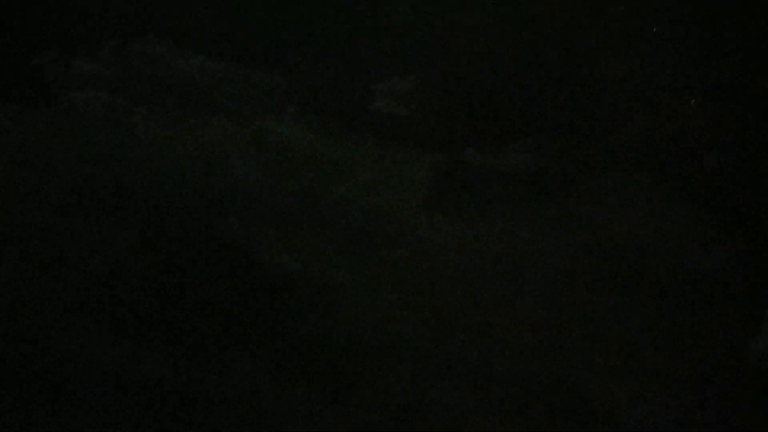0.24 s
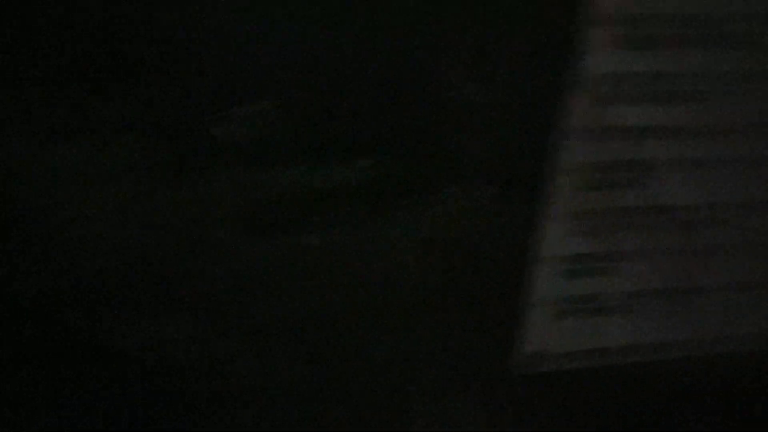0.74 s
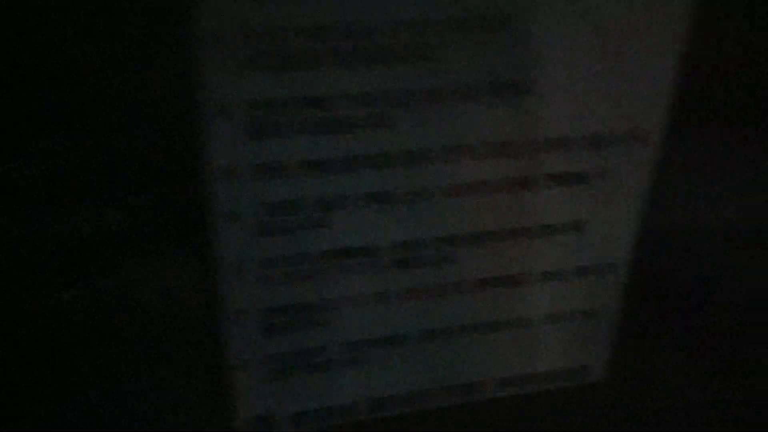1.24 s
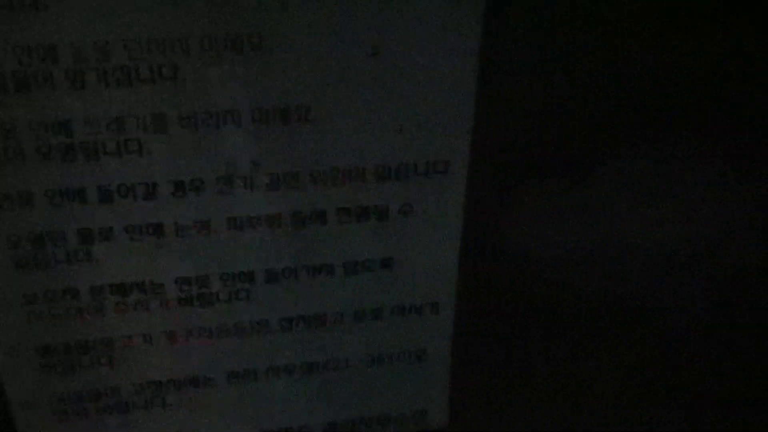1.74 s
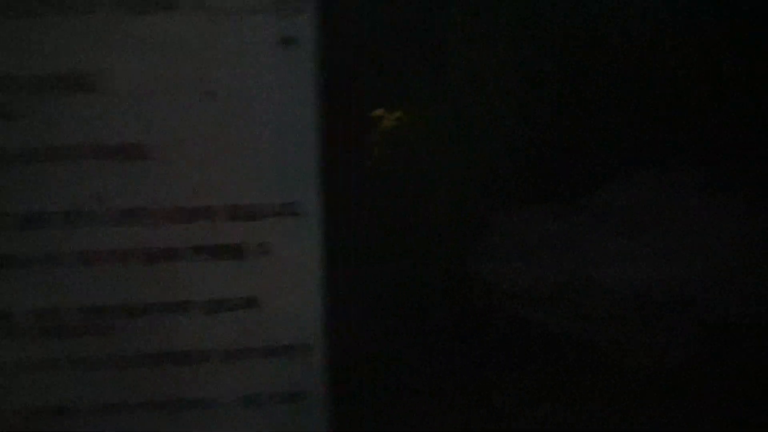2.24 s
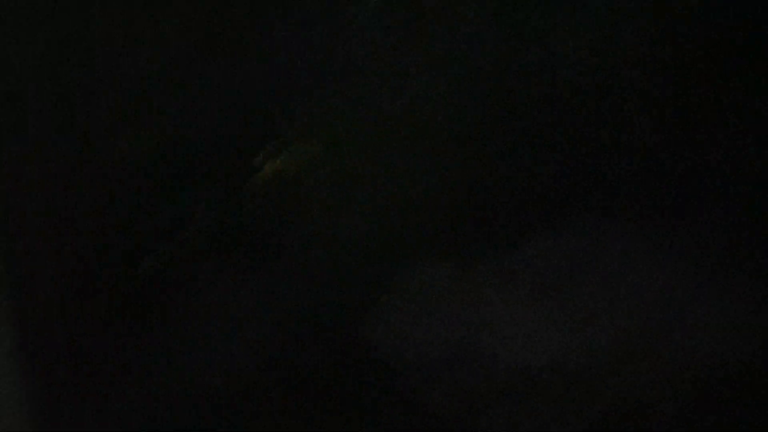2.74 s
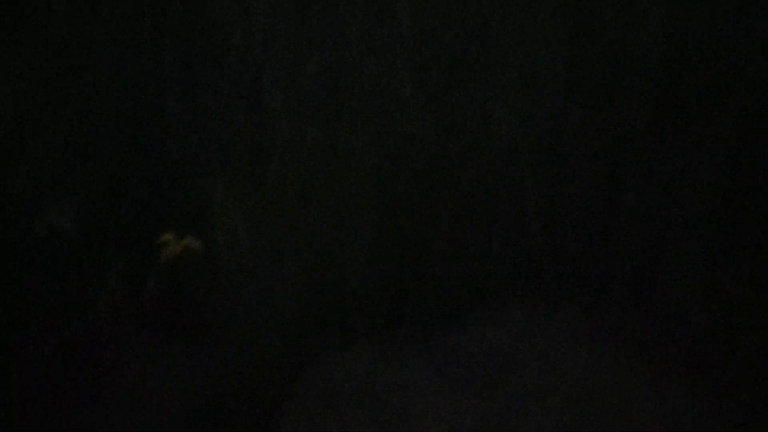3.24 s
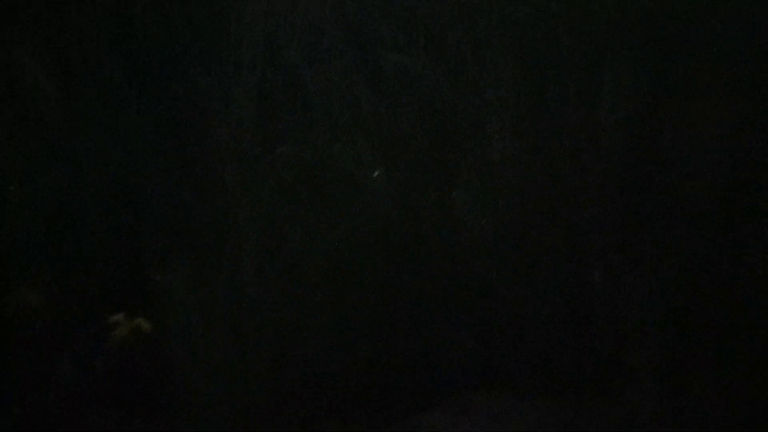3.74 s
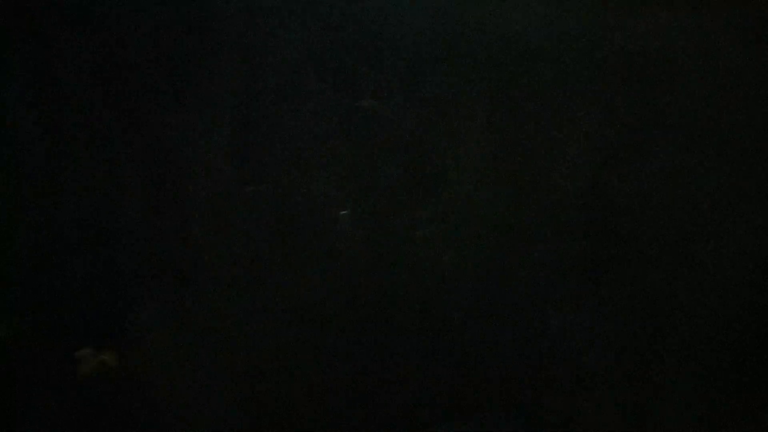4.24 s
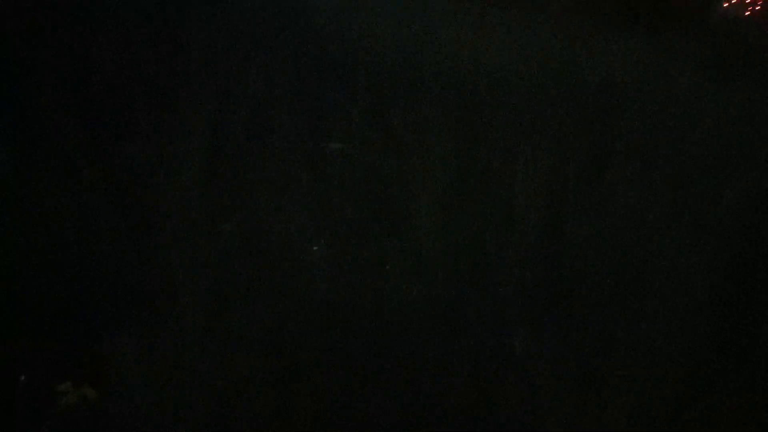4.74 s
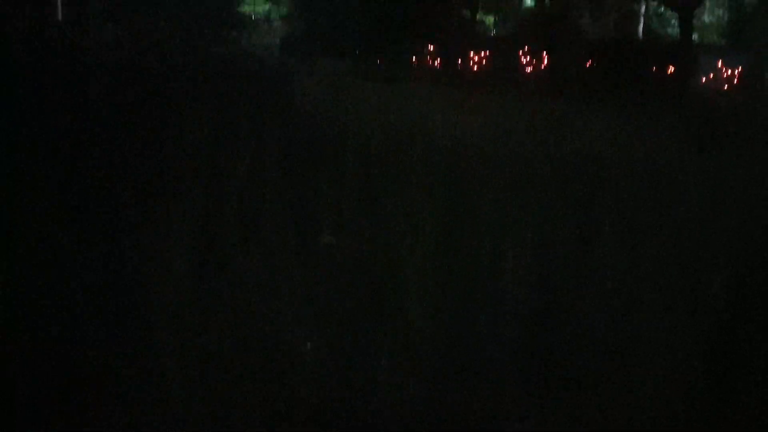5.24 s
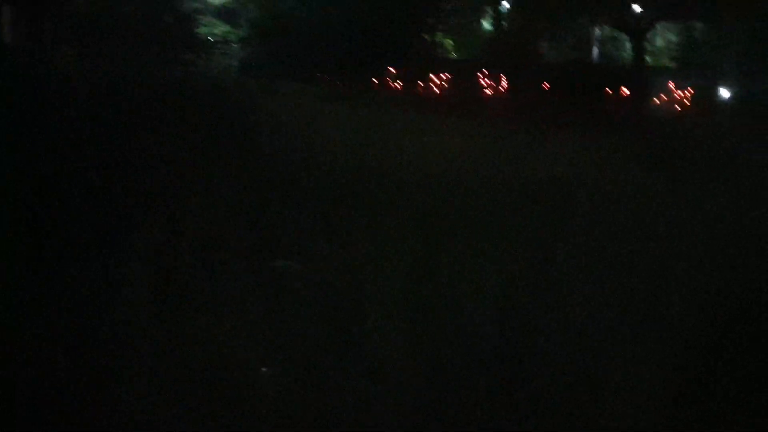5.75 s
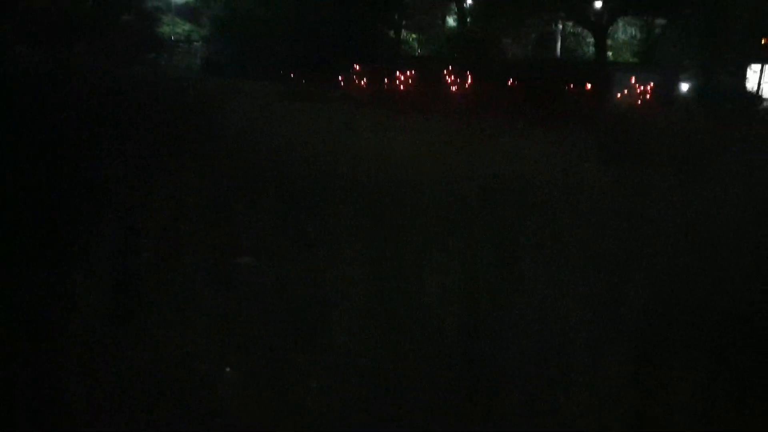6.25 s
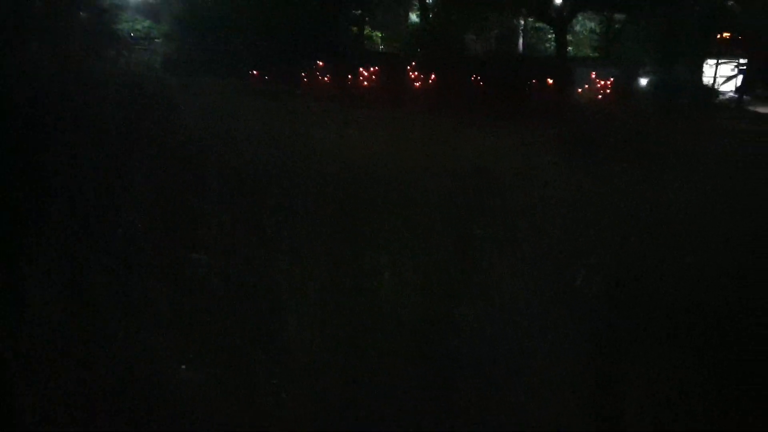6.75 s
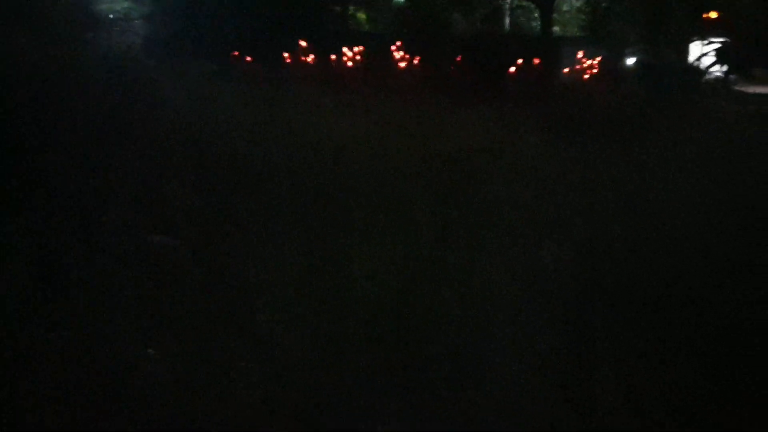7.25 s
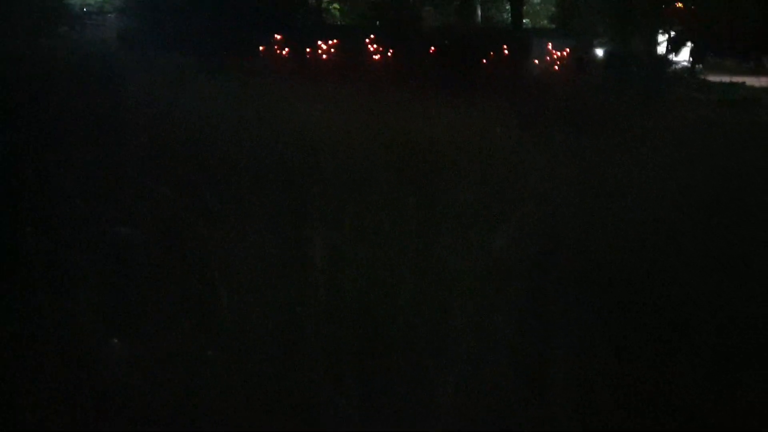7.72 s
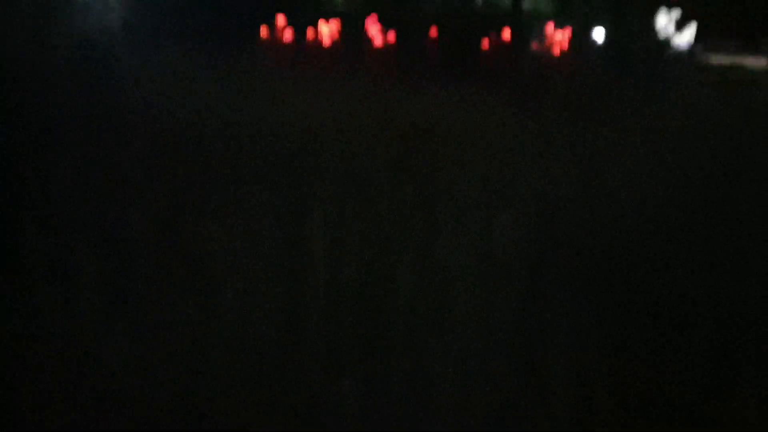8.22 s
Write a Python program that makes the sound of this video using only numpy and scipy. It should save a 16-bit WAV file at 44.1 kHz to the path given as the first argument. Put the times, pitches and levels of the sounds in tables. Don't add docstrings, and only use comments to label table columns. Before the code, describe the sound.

A near tree frog calls three times a second, a shore group answering in the gaps, over night hiss, faint road rumble and microphone bumps.

```python
import sys
import numpy as np
from scipy import signal
from scipy.fft import rfft, irfft
from scipy.io import wavfile

SR = 44100
rng = np.random.default_rng(int(sys.argv[2]) if len(sys.argv) > 2 else 0)


def nominal_scale(level):
    x = np.asarray(level, float) / 20
    return 10 ** x


def materialize(psi):
    bounded = np.clip(np.atleast_2d(psi).T, -1, 1)
    quanta = np.round(bounded * 32767).astype(np.int16)
    wavfile.write(sys.argv[1], SR, quanta)


N = 373968


def at_hz(points, hz):
    point_hz, level_db = np.transpose(points)
    return np.interp(np.log(hz), np.log(point_hz), level_db)


def drift(rate_hz):
    knots = rng.standard_normal(int(N / SR * rate_hz) + 3)
    return np.interp(np.arange(N) / SR * rate_hz, np.arange(len(knots)), knots)


def coloured(spectrum, alike, lag_ms):
    hz = np.maximum(np.arange(N // 2 + 1) * SR / N, 1)
    share = np.clip(at_hz(alike, hz), 0, 1)
    shared, left, right = rfft(rng.standard_normal((3, N)))
    late = shared * np.exp(-2j * np.pi * hz * lag_ms / 1000)
    pair = np.sqrt(share) * np.array([shared, late]) + np.sqrt(1 - share) * np.array([left, right])
    noise = irfft(pair * nominal_scale(at_hz(spectrum, hz)), N)
    return noise / noise.std()


def pulses(at_s, modes, pan_db, lag_ms):
    out = np.zeros((2, N))
    length, lead = 310, 8
    index = np.floor(at_s * SR).astype(int)[:, None] - lead + np.arange(length)
    inside = (index >= 0) & (index < N)
    fade = np.sin(np.pi / 2 * np.minimum(np.arange(length, 0, -1) / 130, 1)) ** 2
    for side, sign in enumerate((1, -1)):
        arrival = at_s + side * lag_ms / 1000
        t = np.maximum(index / SR - arrival[:, None], 0)
        pan = nominal_scale(sign * pan_db / 2)
        wave = 0
        for hz, height, rise_ms in modes:
            u = t / (rise_ms / 1000)
            swell = (u * np.exp(1 - u)) ** 2
            wave = wave + (height * pan)[:, None] * swell * np.sin(2 * np.pi * hz[:, None] * t)
        out[side] = np.bincount(index[inside], (wave * fade)[inside], N)
    return out


# pitch_hz, level_db (per Hz)
ROAD_COLOUR = [(12, -59.5), (20, -44.5), (37, -6.5), (64, 1.5), (112, -6), (166, -13.5), (310, -19),
               (352, -20), (433, -20.5), (900, -24), (1170, -64.5), (1980, -120)]
# pitch_hz, likeness (0-1)
ROAD_ALIKE = [(25, 0.35), (70, 0.6), (150, 0.88), (400, 0.7), (900, 0.5)]
# time_s, change_db, half_width_s
ROAD_SWELLS = [
    (1.5, 0.5, 0.3),
    (3.062, 4.5, 0.13),
    (4.1, 0.5, 0.19),
    (5.151, 2.5, 0.22),
    (6.1, -3, 0.15),
    (7.899, 2, 0.1),
    (8.179, 6.5, 0.19),
    (8.48, 2.5, 0.049),
]


def traffic():
    t = np.arange(N) / SR
    level_db = -47.5 + drift(6.4)
    for time_s, change_db, half_width_s in ROAD_SWELLS:
        level_db = level_db + change_db * np.exp(-((t - time_s) / half_width_s) ** 2)
    return nominal_scale(level_db) * coloured(ROAD_COLOUR, ROAD_ALIKE, lag_ms=0.15)


# pitch_hz, level_db (per Hz)
NIGHT_COLOUR = [(410, -51), (700, -28.5), (873, -45.5), (1090, -6), (1830, -18.5), (2170, -12.5),
                (2430, -5.5), (2560, -2), (3370, -21), (3990, -24.5), (5170, -30), (6970, -22),
                (10400, -52), (15600, -73)]
# time_s, level_db
NIGHT_LOUDNESS = [(0.0, -42), (0.57, -38), (1.04, -42), (1.49, -35), (2.24, -37), (2.36, -41), (5.41, -37),
                  (5.55, -34), (6.42, -33), (6.68, -37), (7.75, -37), (8.48, -32)]


def night_noise():
    level_db = np.interp(np.arange(N) / SR, *np.transpose(NIGHT_LOUDNESS))
    noise = coloured(NIGHT_COLOUR, [(1000, 0.64), (9000, 0.35)], lag_ms=0.388)
    return nominal_scale(level_db - 6 + drift(9)) * noise


# start_s, length_s, level_db (rms), low_edge_hz, crackle_db
RUBS = [(0.186, 0.073, -58, 5660, 12), (0.74, 0.13, -57, 4000, 0), (0.762, 0.033, -42.5, 3030, 0.5),
        (1.473, 0.014, -38.5, 2500, 14), (1.602, 0.019, -32.5, 4000, 22), (3.069, 0.016, -50.5, 102.2, -5),
        (1.639, 0.45, -61.5, 7250, -4.5), (1.88, 0.03, -53.5, 7040, 12), (2.478, 0.086, -62, 8450, 3),
        (2.717, 0.057, -59, 6900, 10), (3.055, 0.056, -38.5, 3120, 1), (3.102, 0.034, -61, 4950, -1),
        (3.13, 0.32, -63.5, 6840, 3.5), (4.106, 0.6, -65, 8950, -3), (8.142, 0.076, -63, 8100, 10.5)]


def rustles():
    out, t = np.zeros((2, N)), np.arange(N) / SR
    for start_s, length_s, level_db, low_edge_hz, crackle_db in RUBS:
        span = slice(int(start_s * SR), int((start_s + 10 * length_s) * SR))
        u = (t[span] - start_s) / length_s
        shape = np.minimum(12 * u, 1) * np.exp(-u ** 3)
        steps = np.repeat(rng.standard_normal(len(u) // 40 + 1), 40)[:len(u)]
        crackle = nominal_scale(min(crackle_db, 2.5) * steps)
        band = signal.butter(1, [low_edge_hz, 11000], "band", fs=SR, output="sos")
        rub = signal.sosfilt(band, rng.standard_normal((2, len(u))))
        out[:, span] += nominal_scale(level_db) * shape * crackle * rub
    return out


# start_s, level_db (peak), pitch_hz
HAND_BUMPS = [(0.97, -40.5, 80), (2.805, -42, 51), (3.04, -37, 59.6), (3.057, -36.5, 133),
              (3.917, -32.5, 124.5), (5.08, -52, 66), (5.168, -38, 104), (5.994, -36, 133),
              (6.728, -34, 81.5), (7.866, -37, 69.5), (7.886, -35, 148)]


def bumps():
    out, t = np.zeros((2, N)), np.arange(N) / SR
    for start_s, level_db, pitch_hz in HAND_BUMPS:
        span = slice(int(start_s * SR), int(start_s * SR) + 6000)
        since = t[span] - start_s
        u = since * pitch_hz
        ring = np.sin(2 * np.pi * pitch_hz * since) + 0.48 * np.sin(3.1 * np.pi * pitch_hz * since)
        out[:, span] += nominal_scale(level_db) * u * np.exp(1 - u) * ring
    return out


# start_s, level_db (peak), pitch_hz,
# rise_ms
LOW_RINGS = [
    (0.777, -30, 440, 10.4),
    (1.4765, -38, 546, 4.2),
    (1.4765, -38, 804, 2),
    (1.6019, -33.5, 474, 2.3),
    (1.603, -36.5, 904, 3.5),
    (1.612, -43, 562, 5.8),
]


def knocks():
    out = np.zeros(N)
    t = np.arange(SR // 10) / SR
    for start_s, level_db, pitch_hz, rise_ms in LOW_RINGS:
        u = t / (rise_ms / 1000)
        ring = (u * np.exp(1 - u)) ** 2 * np.sin(2 * np.pi * pitch_hz * t)
        out[int(start_s * SR):][:len(t)] += nominal_scale(level_db) * ring
    return out


# start_s, level_db (peak), pitch_hz
PLASTIC_TICKS = [
    (1.477, -28.5, 5970),
    (1.4855, -56, 8500),
    (1.604, -29.5, 6930),
    (1.607, -26, 6270),
    (3.057, -37, 7900),
    (3.073, -33, 6900),
]


def ticks():
    start_s, level_db, pitch_hz = np.transpose(PLASTIC_TICKS)
    height = nominal_scale(level_db)
    modes = [(pitch_hz, height, 0.5), (0.98 * pitch_hz, height, 0.3)]
    return pulses(start_s, modes, np.full(len(start_s), -3.0), np.full(len(start_s), 0.25))


def with_direction(calls, bearing):
    start_s = np.transpose(calls)[0]
    time_s, pan_db, lag_ms = np.transpose(bearing)
    return np.column_stack([calls, np.interp(start_s, time_s, pan_db), np.interp(start_s, time_s, lag_ms)])


# share_of_call (0-1), sac_swell_db, throat_swell_db, pitch_factor
CALL_COURSE = [(0, -16, -2, .9), (.08, -10, 0, .912), (.15, -5, 0, .928), (.22, -2.5, 0, .942),
               (.35, 0, -1, .963), (.55, 0, -3, .988), (.9, -1.5, -3, 1.012), (.95, -3, -4, 1.012),
               (1, -8, -7, 1.005)]
QUICKENING = [(0, 8.3), (4, 6.6), (16, 5.3)]
# ratio_to_sac_pitch, level_db, rise_ms, follows_sac (0-1)
FROG_BODY = [(1.003, 0.5, 1.85, 1.0), (0.42, -22, 4.2, 0.6), (.55, -20.5, 5.93, 0.6), (.66, -32, 1.8, 0.9),
             (0.799, -22.5, 10.3, 0.32), (1.552, -31.5, 0.48, 1), (1.8, -33, 0.23, 1)]
# pitch_hz, level_db, rise_ms
PORT_RINGS = [(6930, -39.5, 1.33), (9250, -56.5, .8)]


def tree_frogs(calls, rough_per_db, body=FROG_BODY, count=18):
    start, length, peak_db, hz, pan_db, lag_ms = (c[:, None] for c in np.transpose(calls))
    gaps = np.interp(np.arange(count), *np.transpose(QUICKENING))
    share = (np.cumsum(gaps) - gaps) / gaps[:-1].sum()
    at, sac_db, throat_db, rise = np.transpose(CALL_COURSE)
    clearest = 0.07
    rough = np.clip(clearest + rough_per_db * (-19 - peak_db), clearest, 1)
    chance = rng.standard_normal((len(calls), count, 12)) * rough[..., None]
    colour = rng.standard_normal((len(calls), 1, 10))
    when = start + length * share + 0.0004 * chance[..., 0]
    pitch = hz * np.interp(share, at, rise) * (1 + 0.012 * chance[..., 1])
    resonances = []
    for ratio, level_db, rise_ms, follows in body:
        base = pitch if ratio > 0.45 else hz + 0 * pitch
        wander = 0.045 * (ratio > 1.4) * rng.standard_normal(pitch.shape)
        resonances.append((ratio * base * (1 + wander), level_db, rise_ms, follows))
    for port_hz, level_db, rise_ms in PORT_RINGS:
        resonances.append((port_hz * np.sqrt(pitch / 2600), level_db, rise_ms, 0.9))
    side_on_db = 1.4585 * np.clip(-8.5 - peak_db, 0, 9)
    modes = []
    for k, (mode_hz, level_db, rise_ms, follows) in enumerate(resonances):
        swell_db = np.interp(share, at, follows * sac_db + (1 - follows) * throat_db)
        own_db = 4 * chance[..., 2 + k]
        if k > 0:
            own_db = own_db + 1.5 * colour[..., k] + side_on_db
        height = nominal_scale(peak_db + level_db + swell_db + own_db)
        modes.append((mode_hz.ravel(), height.ravel(), rise_ms))
    return pulses(when.ravel(), modes, np.repeat(pan_db, count), np.repeat(lag_ms, count))


def far_frogs(level_db=-42, count=28):
    # start_s, length_s, level_db, pitch_hz, pan_db, lag_ms
    low = [0.15, 0.1, level_db, 2400, -4, 0.2]
    high = [N / SR, 0.13, level_db + 4, 2750, 1.5, 0.5]
    calls = low + rng.random((count, 6)) * np.subtract(high, low)
    return tree_frogs(calls, rough_per_db=4.0)


# start_s, length_s, level_db (peak), pitch_hz (throat), upper_db
DEEP_GRUNTS = [
    (0.766, 0.027, -32, 542, -1.5),
    (7.013, 0.03, -48, 476, 8),
    (7.085, 0.03, -40.5, 463, 3.5),
    (7.166, 0.034, -39, 459, 2),
    (7.246, 0.0404, -37.5, 493, 2.5),
    (7.297, 0.018, -49, 460, 0),
]


def grunts():
    out = 0
    for start_s, length_s, level_db, pitch_hz, upper_db in DEEP_GRUNTS:
        gap_s = 2 / pitch_hz
        even = np.arange(0, length_s, gap_s)
        done = even / length_s
        jitter = 0.05 * gap_s * rng.standard_normal(len(even))
        when = start_s + even * (1 + 0.08 * done) + jitter
        height = nominal_scale(level_db - 6 * done + rng.standard_normal(len(even)))
        sink = pitch_hz * (1 - 0.14 * done)
        modes = [(sink, height, 2.3),
                 (1.55 * sink, height * nominal_scale(upper_db - 2), 1.2),
                 (2.05 * sink, height * nominal_scale(upper_db - 1), 1.1)]
        out = out + pulses(when, modes, np.full(len(even), -1.5), np.full(len(even), 0.047))
    return out


# start_s, level_db (peak)
SMALL_FROG_CALLS = [(0.04, -49), (0.68, -47), (5.825, -45), (6.1, -43), (6.41, -46), (6.66, -45),
                    (6.945, -43), (7.25, -44), (7.57, -44), (7.87, -42.5), (8.16, -43), (8.425, -43.5)]


def small_frog(count=10):
    start_s, level_db = np.repeat(SMALL_FROG_CALLS, count, axis=0).T
    step = np.tile(np.arange(count), len(SMALL_FROG_CALLS))
    height = nominal_scale(level_db + 1.5 * rng.standard_normal(len(step)))
    jitter = 0.0002 * rng.standard_normal(len(step))
    when = start_s + 0.0062 * step - 0.00006 * step ** 2 + jitter
    pitch_hz = 3750 + 25 * step
    return pulses(when, [(pitch_hz, height, 1.1)], np.full(len(when), -1.5), np.full(len(when), 0.75))


# start_s, level_db (peak)
RATTLE_STROKES = [(5.4401, -35), (5.4489, -35.5), (5.4624, -36.5), (5.4768, -32.5), (5.5125, -30.5),
                  (5.5227, -33), (5.534, -40), (5.5431, -34.9), (5.5512, -32), (5.5628, -35), (5.5808, -33),
                  (5.59, -36), (5.5996, -32), (5.6188, -36), (5.6308, -32.5), (5.6435, -35), (5.6524, -32.5),
                  (5.6591, -32.4), (5.6694, -30), (5.679, -33), (5.6913, -30), (5.7025, -31), (5.7139, -33.5),
                  (5.7237, -31), (5.7324, -38), (5.742, -30), (5.7532, -36.9), (5.7613, -30.4),
                  (5.7694, -32.8), (5.7797, -30), (5.7881, -33), (5.7958, -30.5), (5.8043, -33),
                  (5.8132, -39), (5.821, -33), (5.8278, -32),
                  (6.136, -30.5), (6.1528, -32.6), (6.16, -28), (6.1704, -31), (6.18, -30), (6.195, -32.7),
                 (6.206, -28.5), (6.2165, -32.5), (6.2276, -38), (6.2346, -33), (6.2436, -31),
                 (6.2597, -37), (6.2743, -31.5), (6.2889, -33), (6.297, -39), (6.308, -35.6), (6.3187, -30),
                 (6.339, -37), (6.3495, -35), (6.3652, -33), (6.3779, -29), (6.3872, -31.6), (6.3976, -33),
                 (6.41, -33.5), (6.417, -31.8), (6.4287, -30), (6.4404, -35), (6.4552, -32.5),
                 (6.4727, -37), (6.4796, -32), (6.4935, -35), (6.503, -31),
                  (1.3815, -36), (1.396, -34.7), (1.409, -36), (1.4154, -37.7), (1.4353, -35.0),
                (1.4412, -34), (1.469, -30), (1.4783, -31), (1.5377, -34.3), (1.5478, -32.5)]
# pitch_hz, level_db, rise_ms
RATTLE_BODY = [(1062, 1.5, 1.76), (1810, 4, 0.6), (2260, -5.5, 2.2), (3830, -21, 0.72)]
# time_s, pitch_hz, level_db (against the stroke)
RATTLE_CLIMB = [(1.33, 3950, -10), (1.6, 4300, -10), (5.43, 4100, -8), (5.56, 4500, -2), (5.585, 4850, 0),
                (5.645, 5050, 0), (5.652, 6700, -6), (5.7, 6950, -4), (5.83, 7100, -7), (6.13, 5200, -14),
                (6.2, 5900, -8), (6.26, 6500, -6), (6.38, 6900, -5), (6.46, 7000, -8), (6.53, 6600, -16)]


def rattles():
    when, level_db = np.array(RATTLE_STROKES).T
    chance = rng.standard_normal((len(when), 4))
    height = nominal_scale(level_db)
    modes = []
    for pitch_hz, mode_db, rise_ms in RATTLE_BODY:
        modes.append((pitch_hz * (1 + 0.014 * chance[:, 0]), height * nominal_scale(mode_db), rise_ms))
    time_s, top_hz, top_db = np.transpose(RATTLE_CLIMB)
    top = np.interp(when, time_s, top_hz)
    bright = height * nominal_scale(np.interp(when, time_s, top_db) + 2 * chance[:, 1])
    modes += [(top * (1 + 0.02 * chance[:, 2]), bright * nominal_scale(-4), 1.3),
              (top * (1 + 0.05 * chance[:, 3]), bright * nominal_scale(-6), 0.6),
              (0.82 * top, bright * nominal_scale(-3), 0.4),
              (0.68 * top, bright * nominal_scale(-5), 0.4)]
    return pulses(when, modes, np.full(len(when), -2.5), np.full(len(when), -0.15))


SHORE_ROUGH_PER_DB = 0.014
# start_s, level_db (peak), pitch_hz (sac)
STRAY_FROG_CALLS = [(0.015, -35, 2080), (0.14, -27, 2990), (0.302, -36.5, 2640), (0.37, -30.5, 2710),
                    (0.405, -31.5, 2630), (1.489, -31, 2470), (1.789, -32.5, 2620), (2.417, -36, 2630),
                    (4.754, -34.5, 2520), (5.561, -34, 2260), (5.619, -28, 2580), (5.696, -35, 2570),
                    (5.899, -32, 2630), (6.183, -29, 2320), (6.241, -28, 2390), (6.292, -26.5, 2650),
                    (6.499, -36, 2480), (8.3, -29, 2570)]


def stray_frogs():
    calls = [(start_s, 0.11, level_db, pitch_hz) for start_s, level_db, pitch_hz in STRAY_FROG_CALLS]
    return tree_frogs(with_direction(calls, NEAR_DIRECTION), SHORE_ROUGH_PER_DB)


# start_s, level_db (peak)
BIG_FROG_CALLS = [(0.03, -33), (0.671, -27.5), (1.041, -33.5), (1.385, -30.5), (1.735, -26), (2.052, -25),
                  (2.345, -28), (2.662, -29.5), (2.975, -29), (3.29, -28.5), (3.612, -31), (3.93, -28.5),
                  (4.251, -27.5), (4.56, -31), (4.86, -31.5), (5.175, -30.5), (5.469, -29.5), (5.79, -27.5),
                  (6.058, -31), (6.34, -28), (6.611, -29.5), (6.915, -26.5), (7.22, -27.5), (7.535, -26.5),
                  (7.831, -27.5), (8.125, -28), (8.42, -30.5)]


def big_frog():
    calls = [(start_s, 0.105, level_db, 2340) for start_s, level_db in BIG_FROG_CALLS]
    return tree_frogs(with_direction(calls, SHORE_DIRECTION), SHORE_ROUGH_PER_DB)


def partners(shore):
    # start_s, length_s, level_db, pitch_hz, pan_db, lag_ms
    shift = [0.02, -0.008, -11.5, -80, -2.5, -0.08]
    spread = [0.025, 0.017, 1.5, 140, 4.5, 0.16]
    return shore + shift + rng.random(shore.shape) * spread


# start_s, length_s, level_db (peak), pitch_hz (sac)
SHORE_FROG_CALLS = [(0.1448, 0.092, -21.5, 2597), (0.468, 0.098, -20.5, 2560), (0.7001, 0.11, -22.5, 2600),
                    (1.043, 0.11, -22, 2585), (1.3629, 0.11, -22, 2586), (1.683, 0.106, -23, 2696),
                    (1.996, 0.12, -24, 2640), (2.3335, 0.11, -24, 2630), (2.6566, 0.11, -24, 2650),
                    (2.9859, 0.11, -24, 2660), (3.292, 0.12, -22.5, 2633), (3.6147, 0.11, -21.5, 2597),
                    (3.9246, 0.1, -22.5, 2615), (4.2331, 0.11, -23.5, 2690), (4.5453, 0.11, -23, 2610),
                    (4.8662, 0.12, -23, 2627), (5.1725, 0.11, -24.5, 2600), (5.506, 0.095, -23.5, 2610),
                    (5.7513, 0.12, -25, 2575), (6.1345, 0.11, -25, 2577), (6.4083, 0.14, -23.5, 2550),
                    (6.7598, 0.11, -24, 2600), (7.0883, 0.11, -24, 2616), (7.378, 0.12, -24.5, 2600),
                    (7.6967, 0.11, -24.5, 2580), (8.0293, 0.1, -23.5, 2616), (8.3543, 0.12, -24, 2605)]
# time_s, pan_db (left minus right), lag_ms (right port)
SHORE_DIRECTION = [(0.3, -2.5, 0.39), (2.6, 1.5, 0.45), (2.998, -5.5, 0.49), (3.598, -1.5, 0.39),
                   (5.1, -2, 0.48), (5.7, -3.5, 0.48), (8.4, -1, 0.47)]


def shore_group():
    shore = with_direction(SHORE_FROG_CALLS, SHORE_DIRECTION)
    return tree_frogs(np.vstack([shore, partners(shore)]), SHORE_ROUGH_PER_DB)


# start_s, length_s, level_db (peak), pitch_hz (sac)
NEAR_FROG_CALLS = [(0.1853, 0.1045, -20.3, 2629), (0.5167, 0.1005, -20.1, 2666),
                   (0.892, 0.104, -17.9, 2603), (1.2257, 0.107, -19.6, 2657), (1.5333, 0.1195, -22.7, 2594),
                   (1.8633, 0.107, -25.4, 2569), (2.1932, 0.104, -23.8, 2603), (2.529, 0.1015, -23.0, 2671),
                   (2.8458, 0.103, -21.8, 2669), (3.1591, 0.1085, -17.5, 2624),
                   (3.4926, 0.1015, -16.6, 2684), (3.8051, 0.104, -16.5, 2678),
                   (4.1228, 0.1015, -17.2, 2642), (4.4196, 0.112, -17.5, 2587),
                   (4.7288, 0.111, -18.0, 2612), (5.0361, 0.112, -17.0, 2585),
                   (5.3669, 0.1055, -17.2, 2636), (5.675, 0.1065, -17.2, 2594),
                   (5.9964, 0.105, -17.9, 2631), (6.3309, 0.1015, -17.4, 2569), (6.6178, 0.11, -17.1, 2590),
                   (6.9553, 0.0985, -17.7, 2649), (7.2694, 0.1015, -18.1, 2662),
                   (7.5887, 0.0985, -18.9, 2689), (7.8923, 0.1025, -17.4, 2673),
                   (8.2116, 0.1035, -17.0, 2654)]
# time_s, pan_db (left minus right), lag_ms (right port)
NEAR_DIRECTION = [(0.1, -1, 0.28), (0.5, -4, 0.26), (1.5, 3, 0.36), (2.5, -0.5, 0.25), (2.85, -8, 0.26),
                  (3.5, -4, 0.28), (4.1, -2.5, 0.32), (5.4, -5, 0.33), (8.4, -3.5, 0.41)]
# ratio_to_sac_pitch, level_db, rise_ms, follows_sac (0-1)
NEAR_FROG_BODY = [(1.0, 0, 1.85, 1), (.405, -26.5, 5.4, 0.0), (.495, -27, 2.4, 0.77), (.62, -29, 3.2, 1),
                  (1.16, -27, 1.16, 0.85), (1.53, -39, 2.2, 0.9), (1.72, -38, 0.5, 1)]


def near_frog():
    calls = with_direction(NEAR_FROG_CALLS, NEAR_DIRECTION)
    return tree_frogs(calls, rough_per_db=0.008, body=NEAR_FROG_BODY)


# delay_s, level_db
WATER_ECHOES = [(0.023, -35.5), (0.04, -16.5)]


def field(x, scattered):
    dull, out = signal.lfilter([0.55], [1, -0.45], x), x.copy()
    for delay_s, level_db in WATER_ECHOES:
        for side in (0, 1):
            lag = int(delay_s * (1 + 0.2 * side) * SR)
            out[side, lag:] += nominal_scale(level_db) * dull[side, :-lag]
    t = np.arange(SR // 4) / SR
    reeds_t60_s, reeds_db = 0.055, -11
    tail = rng.standard_normal((2, len(t))) * nominal_scale(-60 * t / reeds_t60_s) * (t > 0.002)
    tail /= np.linalg.norm(tail, axis=1, keepdims=True)
    return out + nominal_scale(reeds_db) * signal.fftconvolve(scattered, tail, axes=1)[:, :N]


def scene():
    no_bass = signal.butter(8, 975, "high", fs=SR, output="sos")
    clear = signal.sosfilt(no_bass, near_frog() + small_frog() + rattles())
    hidden = signal.sosfilt(no_bass, shore_group() + big_frog() + stray_frogs() + far_frogs())
    hidden = hidden + grunts()
    scattered = nominal_scale(-10) * clear + hidden
    port_tilt_db = np.array([[0.825], [-0.825]])
    frogs = field(clear + hidden, scattered) * nominal_scale(port_tilt_db)
    handling = rustles() + bumps() + knocks() + ticks()
    rest = night_noise() + traffic() + handling
    return frogs + rest * nominal_scale([[-1.2], [1.2]])


def roll_off(x):
    return signal.sosfilt(signal.butter(12, 15740, fs=SR, output="sos"), x)


def record(dry):
    hissy = dry + nominal_scale(-73) * rng.standard_normal(dry.shape)
    low_pass = signal.cheby2(12, 60, 16000, fs=SR, output="sos")
    mix = signal.sosfilt(low_pass, hissy)
    return roll_off(mix)


dry = scene()
out = record(dry)
materialize(out)
```